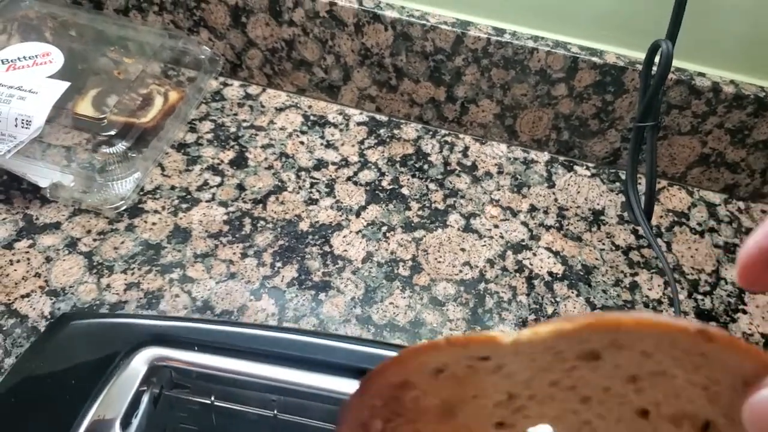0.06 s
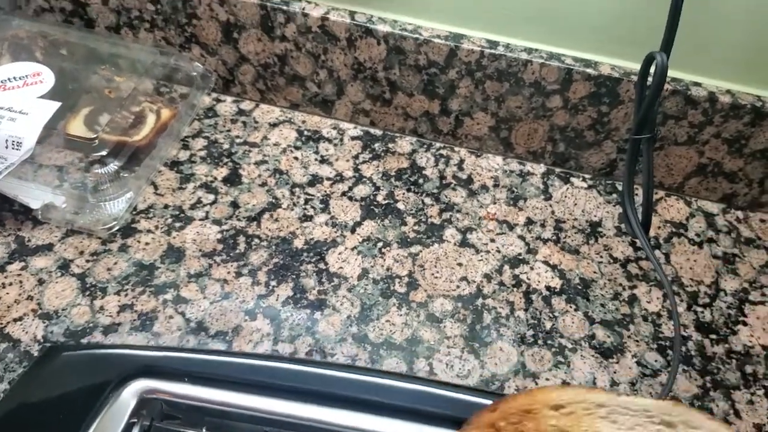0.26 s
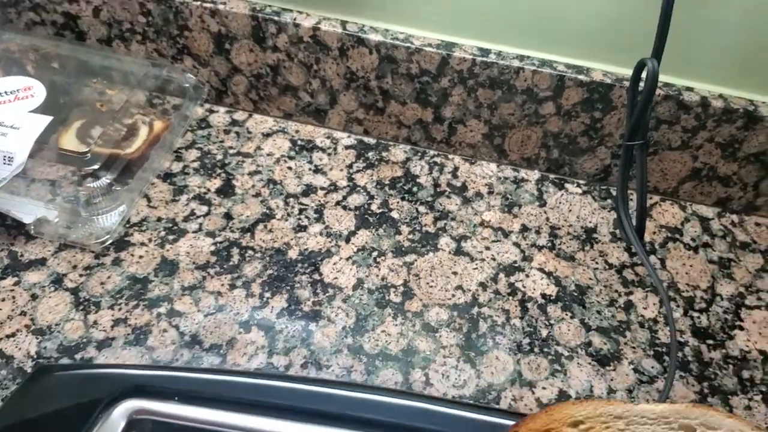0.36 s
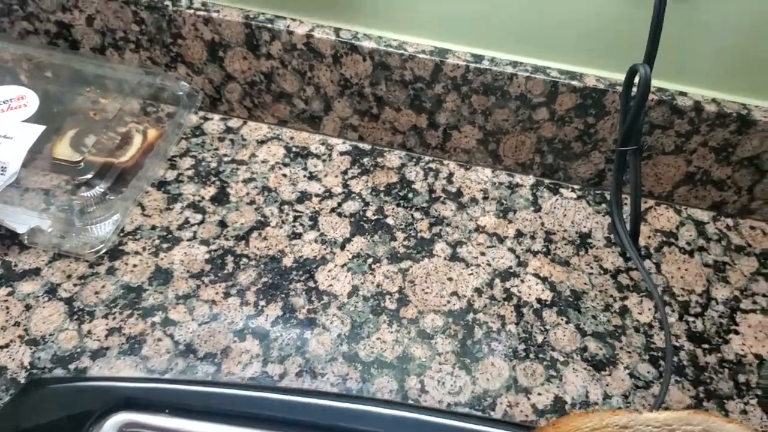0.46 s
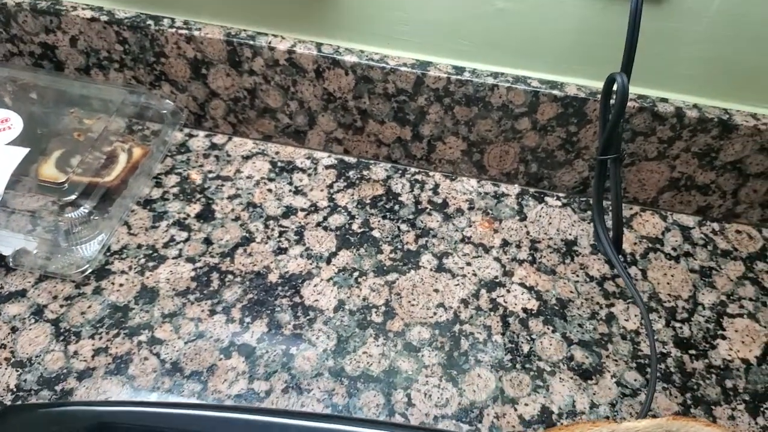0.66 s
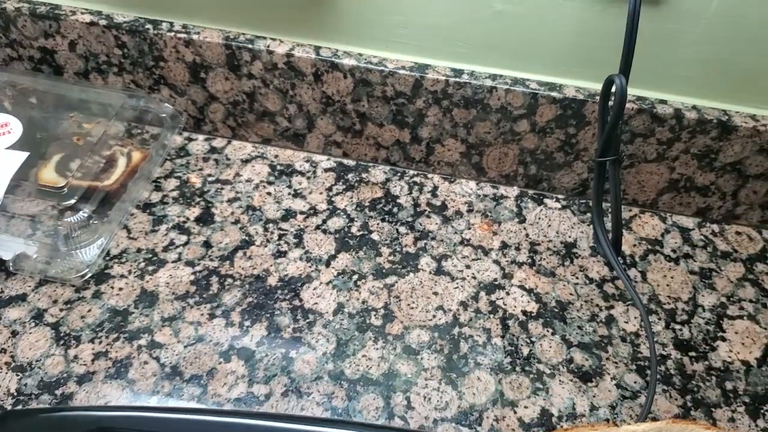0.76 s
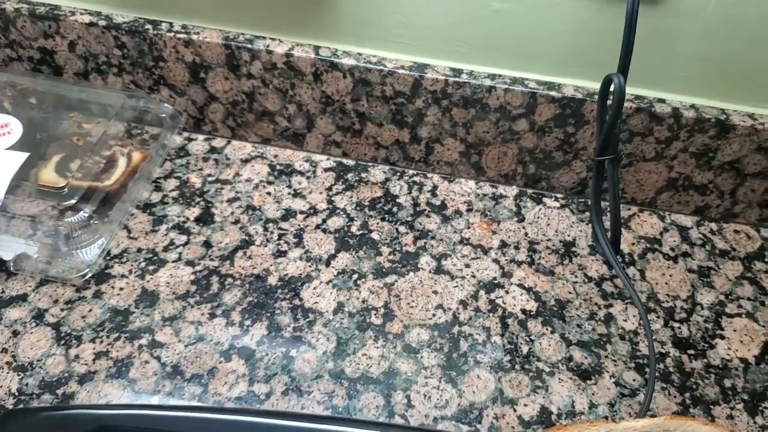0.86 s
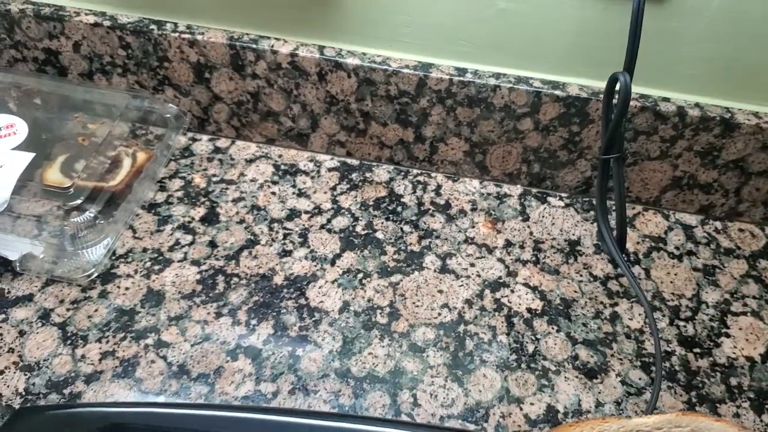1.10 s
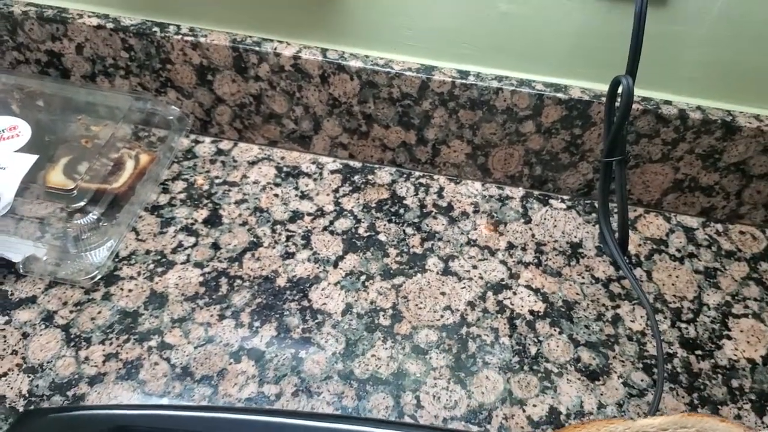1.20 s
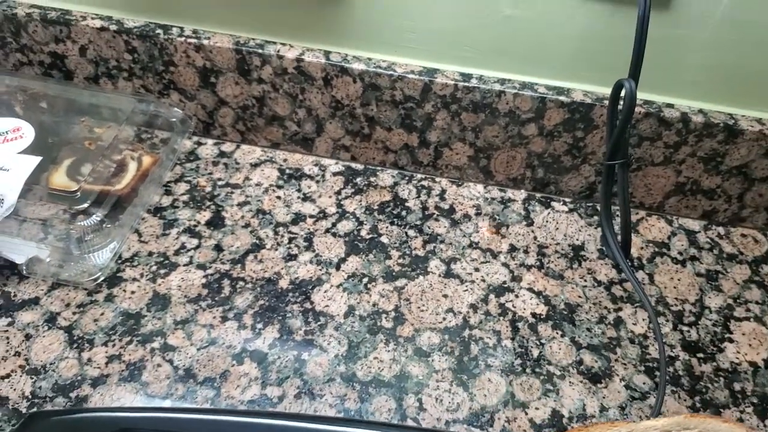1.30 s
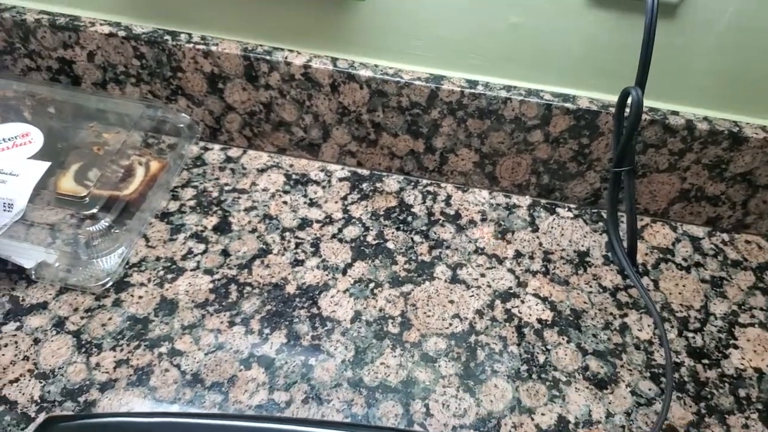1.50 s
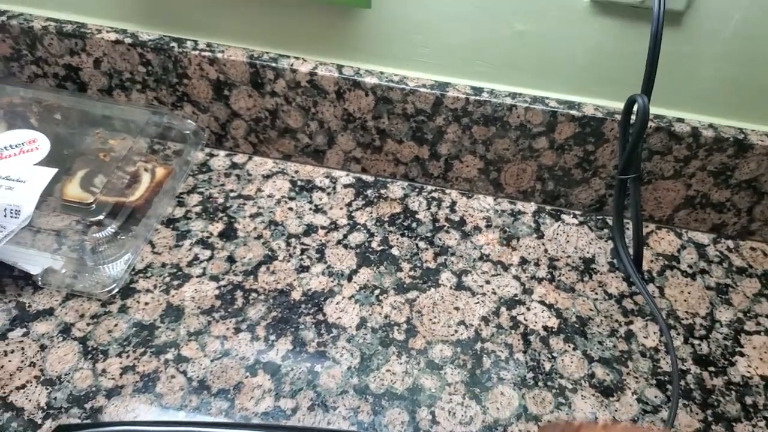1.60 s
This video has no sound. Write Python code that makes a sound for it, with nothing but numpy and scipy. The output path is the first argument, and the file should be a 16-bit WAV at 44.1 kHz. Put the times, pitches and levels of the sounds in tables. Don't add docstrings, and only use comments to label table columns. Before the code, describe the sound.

Close-up in a small, slightly reverberant kitchen, crust lightly scrapes wires, a toaster carriage slams down with clacks and rattle, a late tick follows, then muffled bumps and brushing over faint hum.

```python
import sys
import numpy as np
from scipy import signal
from scipy.fft import rfft, irfft, next_fast_len
from scipy.io import wavfile
from scipy.ndimage import uniform_filter1d

SR = 44100
rng = np.random.default_rng(int(sys.argv[2]) if len(sys.argv) > 2 else 0)


def makeup_ratio(level_db):
    decades = np.asarray(level_db, float) / 20
    return 10 ** decades


def bounce(signal):
    frames = np.transpose(np.atleast_2d(signal))
    limited = np.clip(frames, -1, 1)
    pcm = np.round(limited * 32767).astype(np.int16)
    wavfile.write(sys.argv[1], SR, pcm)


N = 72765

# mode_hz, level_db, t60_s
SHELL = [(237.7, -23.5, 0.37), (279.5, -10, 0.078), (334, -4, 0.026)]
# mode_hz, level_db, t60_s
UPPER = [(405.6, -22, 0.29), (444.5, -6, 0.078), (494, -34, 0.051), (730, -15.5, 0.029)]
# mode_hz, level_db, t60_s
METAL = [(1330, -10, .09), (1850, -14, .06), (800, -11, .08), (2450, -10, .08), (4150, -9, .07),
         (5150, -8, .06), (8700, -15, .04), (13000, -15, .012)]
# frequency_hz, density_db (dB per Hz)
CLACK = [(290, -27), (500, -7), (586, -38), (784, -15), (974, -11), (1870, -10.5), (2930, -14),
         (3390, -16.5), (16000, -29)]
# frequency_hz, density_db (dB per Hz)
CRUST = [(180, -9), (300, -4), (470, -4), (620, -29), (900, -12.5), (3760, -8.5), (5520, -17.5),
         (7320, -18.5), (16000, -23)]
# time_s, level_db
SHAKE = [
    (.19, -69),
    (.24, -56),
    (.26, -48),
    (.36, -47),
    (.43, -59),
    (.53, -65.5),
    (.58, -76),
    (.7, -81.5),
]


def rms_one(x):
    return x / np.sqrt(np.mean(x ** 2) + 1e-20)


def at_hz(points, hz):
    frequency_hz, level_db = np.array(points).T
    return np.interp(np.log(hz), np.log(frequency_hz), level_db)


def curve_gain(rows):
    time_s, level_db = np.transpose(rows)
    return makeup_ratio(np.interp(np.arange(N) / SR, time_s, level_db, left=-200, right=-200))


def decay(t, attack_s, t60):
    return (1 - np.exp(-t / attack_s)) * makeup_ratio(-60 * t / max(t60, .01))


def pan(pan_db):
    return np.array([[pan_db], [-pan_db]]) / 2


def ring(drive, hz, t60):
    radius, w = makeup_ratio(-60 / (t60 * SR)), 2 * np.pi * hz / SR
    return signal.lfilter([0, np.sin(w)], [1, -2 * radius * np.cos(w), radius ** 2], drive + 1e-18)


def whistle(drive, hz, width_hz):
    return rms_one(ring(drive, hz, np.log(1000) / np.pi / width_hz))


def white():
    return rng.standard_normal((2, 2, N))


def grains(per_s, size_db):
    hit = rng.random((2, 2, N)) < per_s / SR
    size = makeup_ratio(size_db * np.minimum(rng.exponential(1, (2, 2, N)), 4))
    return hit * size * white() + 1e-18


def bands(spectrum, source):
    # frequency_hz, coherence
    likeness = [(60, .99), (300, .97), (700, .6), (1500, .15), (15000, .05)]
    edges_hz = 30 * 2 ** np.arange(0, 9.6, .5)
    centres = np.sqrt(edges_hz[1:] * edges_hz[:-1])
    out = []
    for k, hz in enumerate(centres):
        sos = signal.butter(2, edges_hz[k:k + 2], "band", fs=SR, output="sos")
        mid, side = signal.sosfilt(sos, source[k % 2])
        alike = np.clip(at_hz(likeness, hz), -1, 1)
        stereo = np.sqrt(1 + alike) * mid + np.sqrt(1 - alike) * side * np.array([[1], [-1]])
        out.append(makeup_ratio(at_hz(spectrum, hz)) * stereo)
    return np.array(out) / np.sqrt(np.mean(np.sum(out, axis=0) ** 2)), centres


def struck(s, db, modes, spread_db, tilt_db=0, mid_hz=1000):
    out = np.zeros((2, N))
    chance = rng.standard_normal((30, 14))[:len(s)]
    for k, (hz, level_db, t60) in enumerate(modes):
        strength_db = db + level_db + spread_db * chance[:, k] + tilt_db * np.log2(hz / mid_hz)
        clicks = np.zeros(N)
        clicks[(s * SR).astype(int)] = makeup_ratio(strength_db) * (-1) ** k
        rung = ring(clicks, hz, np.maximum(t60, .01))
        out += [rung, np.roll(rung, rng.integers(0, 7))]
    return out


def knocks(rows, spectrum, modes, burst_db, attack_s, mid_hz):
    layers, centres = bands(spectrum, grains(12000, size_db=1.5))
    rows = np.array(rows)
    short_modes = [(hz, db, min(t60, .09)) for hz, db, t60 in modes]
    out = struck(rows[:, 0], rows[:, 1], short_modes, spread_db=-2.0, tilt_db=rows[:, 3], mid_hz=mid_hz)
    for s, db, t60, tilt_db, pan_db in rows:
        i = int(s * SR)
        t = np.arange(min(N - i, SR // 4)) / SR
        colour = makeup_ratio(tilt_db * np.log2(centres / mid_hz))
        burst = np.tensordot(colour, layers[:, :, i:i + len(t)], axes=1)
        out[:, i:i + len(t)] += makeup_ratio(db + burst_db + pan(pan_db)) * decay(t, attack_s, t60) * burst
    return out


def single_modes(rows):
    out = np.zeros((2, N))
    for s, db, hz, t60, pan_db in rows:
        i = int(s * SR)
        t = np.arange(min(N - i, SR // 2)) / SR
        rise_s = .4 / hz
        tone = decay(t, rise_s, t60) * np.sin(2 * np.pi * hz * t)
        out[:, i:i + len(t)] += makeup_ratio(db + pan(pan_db)) * tone
    return out


def air():
    # frequency_hz, density_db (dB per Hz)
    air_spectrum = [(40, -21.5), (110, -15), (200, -20), (420, -30), (600, -35.5), (4000, -39),
                    (8000, -49.5), (13000, -42), (16000, -42)]
    # mode_hz, width_hz, level_db
    hums = [(55.2, 20, -77), (415, 22, -87.5), (1372, 3.8, -99)]
    noise = bands(air_spectrum, white())[0]
    noise = noise.sum(axis=0) / np.std(noise[8:].sum(axis=0))
    mid, side = rng.standard_normal((2, N))
    drive = mid + 0.88 * side * np.array([[1], [-1]])
    return makeup_ratio(-80) * noise + sum(makeup_ratio(db) * whistle(drive, hz, width_hz) for hz, width_hz, db in hums)


def motor():
    # time_s, level_db
    throb = [(0, -78), (.75, -63.5), (.8, -75.5), (.84, -61), (.93, -78.5), (1.02, -62.5), (1.07, -81.5),
             (1.13, -64.5), (1.21, -82), (1.27, -70.5), (1.65, -72)]
    motor_hz, waver_hz = 103.3, 1
    waver = rms_one(uniform_filter1d(rng.standard_normal(N), size=4000))
    phase = 2 * np.pi * np.cumsum(motor_hz + waver_hz * waver) / SR
    return np.sqrt(2) * curve_gain(throb) * np.sin(phase)


def crust():
    # time_s, level_db
    slide = [
        (0, -57.5),
        (.03, -63),
        (.08, -68),
        (.14, -68.5),
        (.19, -75),
        (.2, -74.5),
    ]
    # mode_hz, level_db
    sung_wires = [(1150, -12.5), (2220, -8.5), (2670, -6.5), (3660, -11), (4870, -16)]
    # time_s, level_db
    squeak_times = [
        (0.017, -65),
        (0.101, -67),
        (.145, -67.5),
    ]
    # mode_hz, level_db
    squeak_sides = [(6700, -6), (9500, -8), (13000, -6)]
    squeak_hz, squeak_width_hz, squeak_s = 7350, 70, .007
    source, t = grains(6700, size_db=1.5), np.arange(N) / SR
    sung = sum(makeup_ratio(db) * whistle(source[0], hz, width_hz=15.5) for hz, db in sung_wires)
    scrape = curve_gain(slide) * (bands(CRUST, source)[0].sum(axis=0) + sung)
    swell = sum(makeup_ratio(db) * np.exp(-((t - s) / squeak_s) ** 2 / 2) for s, db in squeak_times)
    voice = whistle(source[1], squeak_hz, squeak_width_hz)
    voice = voice + sum(makeup_ratio(db) * whistle(source[1], hz, width_hz=320) for hz, db in squeak_sides)
    return scrape + swell * voice


def thumps():
    # start_s, level_db, pitch_hz, t60_s, pan_db
    thump_rows = [(0, -64, 57, 1.2, -2), (.193, -42, 352, .25, 0), (.243, -42, 345, .18, 0),
                  (1.29, -63, 431, .15, 0), (1.295, -67, 250, .12, 0), (1.33, -59, 100, .12, -1),
                  (1.367, -57, 440, .08, 0), (1.372, -55, 100, .1, -1), (1.375, -65, 694, .25, 0),
                  (1.39, -56, 65, .22, -2), (1.41, -61, 330, .07, 0), (1.43, -60, 105, .18, -1),
                  (1.43, -67, 694, .1, 0), (1.476, -59, 1250, .04, 0), (1.503, -54, 150, .25, 0),
                  (1.503, -54, 1230, .05, 0), (1.52, -51, 70, .14, -2), (1.53, -61, 240, .1, 0),
                  (1.575, -60, 85, .1, -1), (1.6, -62, 270, .13, 0), (1.6, -63, 1230, .1, 0),
                  (1.61, -55, 110, .12, -1), (1.622, -58, 65, .15, -2)]
    return single_modes(thump_rows)


def shudder():
    # centre_s, level_db, width_s, pitch_hz
    after_ring = (.81, -70, .04, 408)
    noise, t = rng.standard_normal((2, N)), np.arange(N) / SR
    rumble = sum(makeup_ratio(db) * rms_one(ring(noise[k % 2], hz, t60))
                 for k, (hz, db, t60) in enumerate(SHELL + UPPER))
    s, db, width_s, hz = after_ring
    swell = makeup_ratio(db) * np.exp(-((t - s) / width_s) ** 2 / 2) * np.sin(2 * np.pi * hz * t)
    return makeup_ratio(4.5) * curve_gain(SHAKE) * rumble + swell


def rattle():
    source = grains(2200, size_db=3.5)
    sung = sum(makeup_ratio(db - 10.0) * rms_one(ring(source[k % 2], hz, t60 / 4))
               for k, (hz, db, t60) in enumerate(METAL))
    return curve_gain(SHAKE) * (bands(CLACK, source)[0].sum(axis=0) + sung)


def thuds():
    # start_s, peak_db, counter_db, upper_shell_db
    thud_rows = [(0.192, -43, 10, -26), (0.203, -33.5, -16, -29), (0.219, -33, -4, -6.5),
                 (0.243, -31, 3, -34), (0.266, -33, 3, -15), (0.283, -29, 2.5, 11), (0.311, -36, 8, -7),
                 (0.344, -36, 11.5, -17), (0.365, -67.5, -14, 20), (0.395, -26.5, -5, -6),
                 (0.418, -42, 9, -18), (0.53, -47, 4, 2)]
    # mode_hz, level_db, t60_s
    counter = [(112, -6, 0.33), (156.8, -22, 0.31)]
    # start_s, level_db
    rocking = [
        (0.198, -53.5),
        (.25, -33.5),
    ]
    boom_hz, boom_t60_s = 59.2, 0.83
    s, db, low_db, upper_db = np.transpose(thud_rows)
    body = struck(s, db + low_db, counter, 0.73)
    body += struck(s, db, SHELL, 3.2)
    body += struck(s, db + upper_db, UPPER, 1.36)
    body += struck(*np.transpose(rocking), [(boom_hz, 0, boom_t60_s)], 0)
    soft = signal.butter(2, 575, fs=SR, output="sos")
    return makeup_ratio([[-.5], [.5]]) * signal.sosfilt(soft, body)


def clacks():
    # start_s, peak_db, t60_s, brightness_db (per octave), pan_db
    clack_rows = [
        (0.194, -61, 0.21, 5.5, 0),
        (0.2483, -32.5, 0.17, 0.24, -0.5),
        (0.2534, -48.5, 0.021, -4.5, 0),
        (0.2877, -41.5, 0.33, 1.1, 1.5),
        (0.3411, -41.5, 0.2, 3, 1),
        (0.3594, -57, 0.026, -7.5, -12),
        (0.3994, -72.5, 0.087, 17.5, -3),
        (0.4539, -57, 0.061, 11, 9),
        (0.4768, -55.5, 0.06, 11.5, 3),
        (0.5054, -59.5, 0.33, 4.5, -1.5),
    ]
    return knocks(clack_rows, CLACK, METAL, burst_db=-1, attack_s=0.00021, mid_hz=4220)


def pings():
    # start_s, level_db, pitch_hz, t60_s, pan_db
    ping_rows = [(.195, -61, 4250, .06, 0), (.2, -57, 1300, .1, 0), (.2485, -41, 786, .08, 0),
                 (.249, -45, 690, .07, 0), (.249, -49, 5157, .07, 0), (.249, -50, 2207, .08, -2),
                 (.2495, -41, 4091, .05, -3), (.2525, -41, 4300, .045, -3), (.2535, -45, 1319, .1, 3),
                 (.256, -54, 3470, .1, 0), (.2875, -48, 5100, .035, 0), (.2876, -48, 1820, .05, 0),
                 (.342, -49, 5000, .06, 0), (.342, -50, 1150, .07, 0), (.345, -51, 4581, .05, 0),
                 (.356, -57, 12450, .06, 0), (.376, -54, 1954, .07, 0), (.47, -66, 1507, .3, 0),
                 (.4775, -56, 12900, .04, 2), (.4775, -62, 8600, .07, 0), (.528, -57, 650, .06, 0),
                 (.54, -68, 2008, .1, 0), (.53, -74, 3408, .15, 0), (.625, -75, 1147, .25, 0),
                 (.715, -65, 770, .07, 0), (.715, -65, 2900, .05, 0)]
    return single_modes(ping_rows)


def wires():
    # mode_hz, level_db, t60_s
    wire_modes = [(1147, -66, .7), (2234, -62, .9), (2681, -64, .7), (3806, -66, .8)]
    return struck(np.array([.341]), 0, wire_modes, 0.54)


def ticks():
    # start_s, peak_db, t60_s, brightness_db (per octave), pan_db
    tick_rows = [
        (0.715, -46.5, 0.1, 2.8, -1),
        (0.723, -65.5, 0.31, -8, 6),
    ]
    # frequency_hz, density_db (dB per Hz)
    tick_spectrum = [(350, -39), (600, -13), (758, -12), (1010, -26.5), (2310, -2), (16000, -14)]
    # mode_hz, level_db, t60_s
    tick_modes = [(765, -17, .05), (2500, -17, .03)]
    return knocks(tick_rows, tick_spectrum, tick_modes, burst_db=-9.5, attack_s=0.00032, mid_hz=3900)


def bumps():
    # start_s, peak_db, t60_s, centre_hz, thud_db
    bump_rows = [
        (1.289, -56, 0.087, 500, -59),
        (1.309, -68.5, 0.2, 580, -49.5),
        (1.366, -51, 0.1, 543, -85),
        (1.379, -55, 0.027, 406, -58),
        (1.426, -56, 0.095, 1510, -51),
        (1.475, -50, 0.11, 1140, -50),
        (1.502, -39.5, 0.071, 1080, -66),
        (1.523, -63.5, 0.12, 837, -51),
        (1.598, -49, 0.17, 850, -43.5),
    ]
    # mode_hz, level_db, t60_s
    bump_modes = [(714, -9, 0.14), (256, -14.5, 0.1), (102, -23, 0.11), (426, -10, 0.093)]
    half_band_octaves = 0.63
    rows = np.array(bump_rows)
    thud = struck(rows[:, 0] + 0.00306, rows[:, 4], bump_modes, 3.8)
    out = signal.lfilter([.05], [1, -.95], thud)
    mid, side = white()[0]
    for s, db, t60, hz, _ in rows:
        i = int(s * SR)
        t = np.arange(min(N - i, SR // 4)) / SR
        edges_hz = hz * 2 ** np.array([-half_band_octaves, half_band_octaves])
        hollow = signal.butter(2, edges_hz, "band", fs=SR, output="sos")
        scuff = mid[i:i + len(t)] + .5 * side[i:i + len(t)] * np.array([[1], [-1]])
        snap = makeup_ratio(13.0) * (t == 0)
        drive = scuff * decay(t, 0.0013, t60) + snap
        out[:, i:i + len(t)] += makeup_ratio(db + 4.5) * np.sqrt(1000 / hz) * signal.sosfilt(hollow, drive)
    return out


def brushes():
    # start_s, peak_db, t60_s, brightness_db (per octave), pan_db
    brush_rows = [
        (1.475, -70, 0.16, -3.5, -8),
        (1.502, -66.5, 0.16, -4, 0),
        (1.53, -72, 0.81, -3, 0),
        (1.597, -72, 0.35, 4.5, 2.2),
    ]
    return knocks(brush_rows, CRUST, [], burst_db=1.5, attack_s=0.00068, mid_hz=3040)


def kitchen(x):
    t60_s, wall_cut_hz, low_hz = 0.39, 5500, 300
    size = next_fast_len(N + SR)
    w = 2 * np.pi * np.arange(size // 2 + 1) / size
    hz = w * SR / (2 * np.pi)
    spectrum = rfft(x, size) * (1j * hz / (low_hz + 1j * hz)) ** 2
    out = np.zeros((2, N))
    for k, lag in enumerate(rng.uniform(.011, .033, size=16) * SR):
        loss = makeup_ratio(-60 * lag / SR / t60_s) / (1 + .3j * hz / wall_cut_hz)
        loop = loss * np.exp(-1j * w * int(lag))
        out[k % 2] += irfft(spectrum * loop / (1 - loop), size)[:N] * (-1) ** (k // 2)
    return out


def scene():
    near = crust() + thumps() + shudder() + rattle() + thuds() + clacks() + wires() + ticks() + bumps() + brushes()
    left_lag = 6
    near[0] = np.concatenate([np.zeros(left_lag), near[0, :-left_lag]])
    near += pings()
    return near + makeup_ratio(-15.5) * kitchen(near.mean(axis=0)) + air() + motor()


def band_limit(x):
    return signal.sosfilt(signal.butter(12, 16760, fs=SR, output="sos"), x)


def record(dry):
    bass_cut = signal.butter(4, 40.2, "high", fs=SR, output="sos")
    top_cut = signal.cheby2(12, 60, 16750, fs=SR, output="sos")
    mix = signal.sosfilt(top_cut, signal.sosfilt(bass_cut, dry))
    return band_limit(mix)


dry = scene()
out = record(dry)
bounce(out)
```